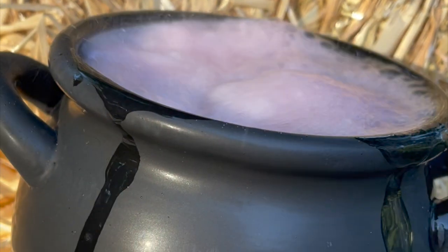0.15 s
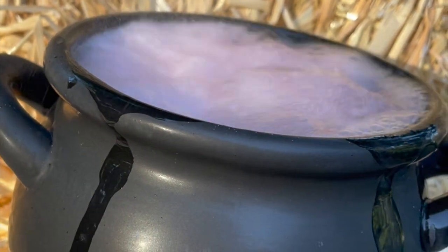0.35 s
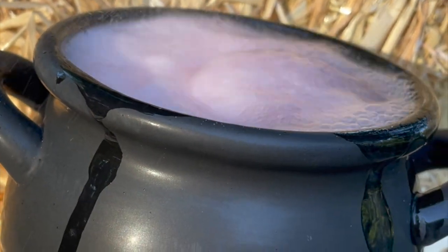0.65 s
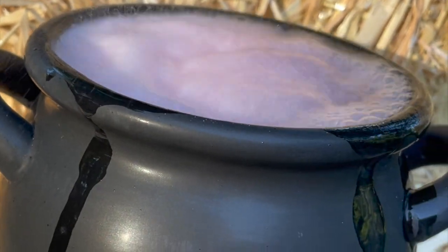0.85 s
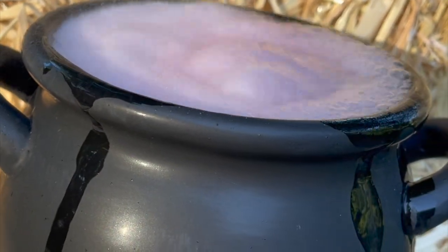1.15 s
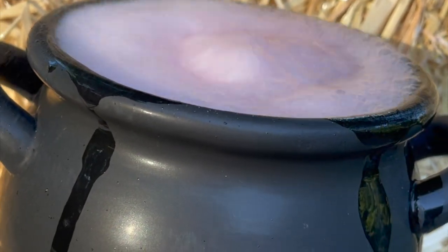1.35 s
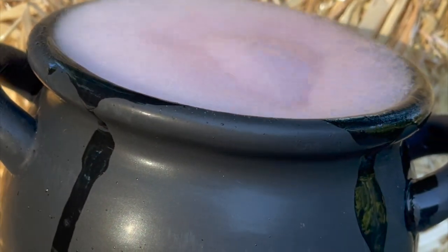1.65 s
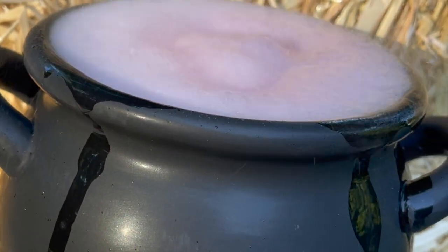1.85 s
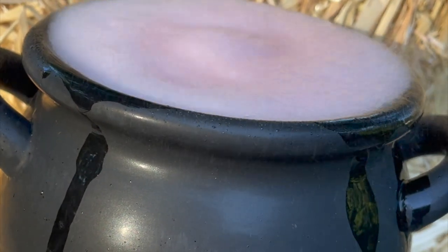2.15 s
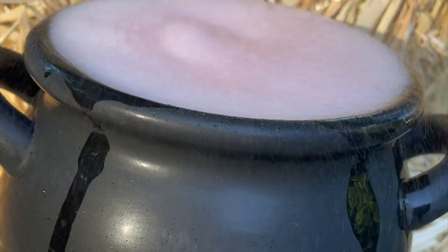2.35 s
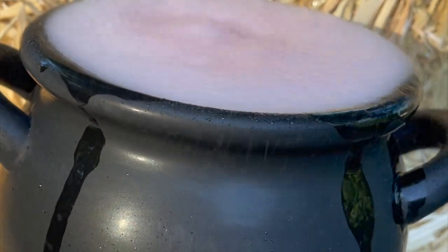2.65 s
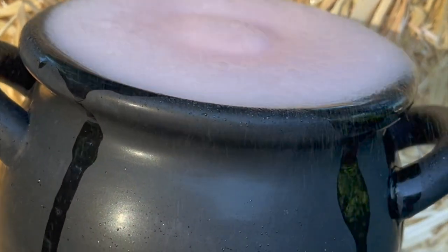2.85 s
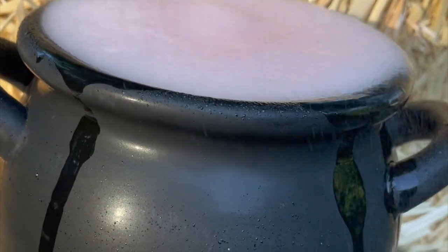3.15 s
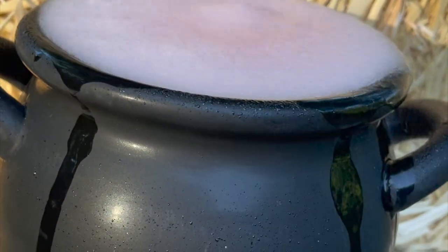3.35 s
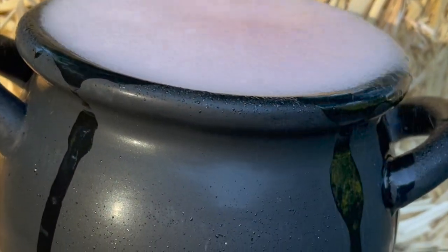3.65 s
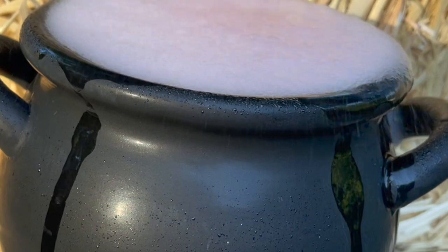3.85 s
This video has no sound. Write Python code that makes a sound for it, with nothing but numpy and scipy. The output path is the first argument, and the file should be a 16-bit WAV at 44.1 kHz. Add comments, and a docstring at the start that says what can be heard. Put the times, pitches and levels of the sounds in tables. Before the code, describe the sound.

Fizzing bath bomb hisses brightly in water, dulling as foam thickens, with pops and wind thumps

```python
"""A pop and a bright, dense fizz come first: a bath bomb in a small cauldron of water outdoors.
The fizz is a swarm of tiny pings over noise; it dulls as the foam thickens and larger bubbles pop.
Something hard clacks once near the start: four quick contacts set broad resonances ringing.
Light wind on the microphone is low noise that follows gusts, plus thumps of a few slowing swings."""
import sys
import numpy as np
from scipy import signal
from scipy.fft import rfft, irfft
from scipy.io import wavfile
from scipy.ndimage import uniform_filter1d

SR = 44100
rng = np.random.default_rng(int(sys.argv[2]) if len(sys.argv) > 2 else 0)


def dump(signal):
    """Clip the signal to [-1, 1] and save it as 16-bit WAV at the path in sys.argv[1]."""
    limited = np.clip(np.atleast_2d(signal).T, -1, 1)
    pcm = np.round(limited * 32767).astype(np.int16)
    wavfile.write(sys.argv[1], SR, pcm)


N = 176400  # samples: 4 seconds
TIME, BINS = np.arange(N) / SR, np.fft.rfftfreq(N, 1 / SR)  # s, Hz

# Hiss colour under thin foam: [f/Hz, level/dB per Hz]
THIN_FOAM_HISS = [(200, -26.5), (750, -15), (1150, -27), (1600, -18.5), (2600, -16.5), (3900, -8.5),
                  (4600, -11), (5400, -6), (6100, -9), (8500, -12.5), (9800, -8.5), (10900, 2.5),
                  (11700, -3.5), (12500, 0), (13600, -11), (15500, -37)]
# Hiss colour under thick foam: [f/Hz, level/dB per Hz]
THICK_FOAM_HISS = [(200, -9), (750, -15), (1120, -22), (1550, -8), (2700, -5.5), (4500, -11), (5400, -0.5),
                   (6100, -6), (6600, -9.5), (8500, -2.5), (9700, -1.5), (11000, 1), (12200, -17),
                   (15500, -87)]
# How the foam grows: [t/s, thickness 0-1, fizz level/dB added to the base levels below]
FOAM_GROWTH = [(0, 0.16, 3.5), (.55, 0.06, -1.5), (.9, 0.03, -0.5), (1.598, 0.32, 1.5), (2.5, 0.56, 1),
               (2.95, 0.9, 3), (4, 0.85, 3.5)]
# Broad hum of the thickening foam: [t/s, f/Hz, level/dB]
FOAM_HUM = [(2.2, 2280, -65), (2.901, 2023, -59), (4, 1459, -48)]
# Larger bubbles: [t/s, level/dB, f/Hz]
LARGE_POPS = [(.002, -6, 2860), (0.121, -21, 8070), (2.752, -29.5, 3190), (2.8933, -8, 4120),
              (3.0345, -23, 2950), (3.0368, -5.5, 9830), (3.0735, -24.5, 3800), (3.4897, -24, 11060),
              (3.532, -15.5, 9620), (3.563, -15.5, 4040), (3.6446, -12.5, 2890), (3.6853, -10.5, 4410),
              (3.741, -16.5, 6900), (3.9299, -16.5, 3800), (3.9464, -18, 7210), (3.958, -20.5, 2790),
              (3.985, -10, 4540)]
# Patches of collapsing foam: [centre t/s, length/s, level/dB, f/Hz]
FOAM_COLLAPSES = [(0.068, 0.074, -40, 3070), (.196, 0.02, -28, 2860), (.189, 0.019, -26, 10800),
                  (3.522, 0.042, -38.5, 6440)]
# Contacts of the hard clack: [t/s, level/dB, scrape decay/s, bass level/dB, treble level/dB]
CLACK_CONTACTS = [(.3357, -3, 0.0048, -18, -3), (.3392, -10, 0.0042, -1, 7.5), (.3450, -6, 0.0019, 0, 7),
                  (.3507, -6.5, 0.0026, 8, 2)]
# What the clack rings with: [f/Hz, level/dB]
CLACK_RESONANCES = [(200, -32.5), (680, -5), (1050, -12), (2200, 1), (2900, 0), (3700, -11), (5200, -18),
                    (6100, -11.5), (8000, -6), (9600, -13), (11000, -8.5), (13500, -40)]
# How long the far echoes last: [f/Hz, time to fade by 60 dB/s]
FAR_ECHO_FADE = [(2500, 0.22), (9000, 0.19)]
# Wind puffs: [centre t/s, level/dB, f at the centre/Hz, half length/s, pitch fall rate/per s]
WIND_PUFFS = [(0.137, -22, 127, 0.0057, 20), (3.518, -17.5, 83, 0.0072, 3), (3.6649, -7.5, 250, 0.0024, 24),
              (3.677, -8, 205, 0.0016, 20), (3.7201, -6.5, 304, 0.0014, 45), (3.727, -5.5, 142, 0.0066, 64)]
# Colour of the wind rumble: [f/Hz, level/dB per Hz]
WIND_COLOUR = [(62, 0.5), (140, 2.5), (250, -4), (500, -23), (1500, -43)]
# Strength of the wind: [t/s, level/dB]
WIND_GUSTS = [(0, -51.5), (.28, -44.5), (.45, -55), (.55, -45.5), (.95, -47.5), (1.58, -44), (2.6, -50.5),
              (3.42, -51.5), (3.5, -38.5), (3.77, -31), (3.87, -55)]
# How alike the two microphone ports hear a spread-out source: [f/Hz, likeness 0-1]
PORT_LIKENESS = [(300, 0.97), (650, 0.5), (1700, 0.92), (9500, 1)]
# How far the left port is ahead of the right: [f/Hz, phase lead/radians]
LEFT_PORT_LEAD = [(1700, 0.16), (4250, 1.4), (4850, 2.22), (5700, 7.76), (6400, 6.38), (8400, 8.98),
                  (9600, 9.83), (12000, 12.02)]

THIN_DB, THICK_DB, FLICKER_DB = -37, -42.5, .5  # base hiss levels; rms size of the level flicker
BURSTS_PER_S, BURST_RING_S = 9000, .0009  # for one swarm, all pitches together
BURST_SPREAD_DB = 3.6  # average boost in the uneven burst sizes, before a limit
WASH_SHARE = .68  # part of the fizz power that is smooth noise
PATCH_DB, PATCH_HZ, PATCH_S = 2.2, 300, .032  # clusters: rms size, approximate width and length
FOAM_HUM_WIDTH_HZ = 390
RUSTLE_GRAINS_PER_S, RUSTLE_WIDTH_HZ = 1300, 920
POP_SWELL_S, OVERTONE_RATIO, OVERTONE_DB = .00065, 1.67, -12  # overtone relative to the main ring
POP_SNAP, SNAP_WIDTH_HZ = .59, 480  # snap amount; distance from the pitch where its gain halves
SMALL_POPS_PER_S = 75  # rate that fully thick foam would give
SMALL_POP_DB, SMALL_POP_HZ = -34, (2800, 11000)  # middle level; lowest and highest pitch
CLACK_KICK, CLACK_GRIT, CLACK_RISE_S = 6, .65, .00043  # kick and scrape amounts; scrape rise
NEAR_DECAY_S, NEAR_DB, FAR_DB = .005, -8, -13  # echo levels relative to the direct sound
LOW_CUT_HZ, EDGE_HZ = 33.8, 15800  # bottom and top of what is heard


def amp(db):
    """Turns decibels into gain."""
    return 10 ** (np.asarray(db) / 20)


def unit(x):
    """Scales to an rms of 1."""
    return x / np.sqrt(np.mean(x ** 2) + 1e-20)


def read(points, hz):
    """Reads a table of values against frequency, with frequency spaced as the ear spaces pitch."""
    f, value = np.transpose(points)
    return np.interp(np.log(hz + 1), np.log(f + 1), value)


def colour(x, gain):
    """Filters by a gain for each frequency."""
    return irfft(rfft(x) * gain, x.shape[-1])


def add(mix, s, sound):
    """Adds a sound to the mix at s seconds, cutting off what runs past the end."""
    part = mix[:, max(round(s * SR), 0):][:, :sound.shape[-1]]
    part += sound[..., :part.shape[1]]


def pair(x):
    """Blends two unrelated signals until they are as alike as the ports hear a spread-out source."""
    z = rfft(x)
    same = read(PORT_LIKENESS, np.fft.rfftfreq(x.shape[1], 1 / SR))
    mid = np.sqrt((1 + same) / 2) * z[0]
    side = np.sqrt((1 - same) / 2) * z[1]
    return irfft(np.array([mid + side, mid - side]), x.shape[1])


def fizz():
    """Bubble bursts flicker in level and lose their top as the foam grows over them."""
    s, thick, db = np.transpose(FOAM_GROWTH)
    thick = np.interp(TIME, s, thick)
    swarm = patchy(pair(np.array([tiny_bursts(), tiny_bursts()])))
    bright = amp(THIN_DB) * unit(colour(swarm, amp(read(THIN_FOAM_HISS, BINS))))
    dull = amp(THICK_DB) * unit(colour(swarm, amp(read(THICK_FOAM_HISS, BINS))))
    flicker = unit(uniform_filter1d(rng.standard_normal(N), size=400))
    level = amp(np.interp(TIME, s, db) + FLICKER_DB * flicker)
    return ((1 - thick) * bright + thick * dull) * level


def tiny_bursts(count=40):
    """Each bubble gives a very short ping; many pitches and uneven sizes lie over a smooth wash."""
    t, pings = np.arange(512) / SR, np.zeros(N)
    for hz in np.linspace(SR / 100, EDGE_HZ, count):
        boost_db = BURST_SPREAD_DB * np.minimum(rng.exponential(1, N), 5)
        size = amp(boost_db) * rng.choice([-1, 1], N)
        train = size * (rng.random(N) < BURSTS_PER_S / count / SR)
        ping = np.exp(-t / BURST_RING_S) * np.sin(2 * np.pi * hz * t)
        pings += signal.oaconvolve(train, ping)[:N]
    wash = rng.standard_normal(N)
    return np.sqrt(1 - WASH_SHARE) * unit(pings) + np.sqrt(WASH_SHARE) * wash


def patchy(x):
    """Bubbles burst in clusters of like size: short patches swell and fade across the spectrum."""
    z = signal.stft(x, SR, nperseg=512)[2]
    field = rng.standard_normal(z.shape[1:])
    field = uniform_filter1d(field, round(PATCH_HZ * 512 / SR), axis=0)  # across pitch
    field = uniform_filter1d(field, round(PATCH_S * SR / 256), axis=1)  # along time
    return signal.istft(z * amp(PATCH_DB * unit(field)), SR, nperseg=512)[1][:, :N]


def foam_tone():
    """Fizz inside the foam rings a broad resonance that sinks as the layer grows."""
    s, hz, db = np.transpose(FOAM_HUM)
    # Slow noise carried up to the moving pitch becomes a band of noise around it.
    band = colour(rng.standard_normal((2, N)), 1 / (1 + (2 * BINS / FOAM_HUM_WIDTH_HZ) ** 4))
    turn = 2 * np.pi * np.cumsum(np.interp(TIME, s, hz)) / SR
    hum = unit(band[0] * np.cos(turn) + band[1] * np.sin(turn))
    return amp(np.interp(TIME, s, db)) * hum


def pop(db, hz):
    """A film snaps and the cavity under it rings for a few cycles, with one weak overtone."""
    t, f = np.arange(1024) / SR, np.fft.rfftfreq(1024, 1 / SR)
    noise = pair(rng.standard_normal((2, len(t))))
    snap = unit(colour(noise, 1 / (1 + abs((f - hz) / SNAP_WIDTH_HZ) ** 2.31)))
    overtone = amp(OVERTONE_DB) * np.sin(2 * np.pi * OVERTONE_RATIO * hz * t)
    ring = np.sin(2 * np.pi * hz * t) + overtone
    swell = t / POP_SWELL_S * np.exp(1 - t / POP_SWELL_S)  # peaks at 1, then dies away
    return amp(db) * swell * (ring + POP_SNAP * snap)


def small_pops(count=300):
    """Small bubbles pop faintly at random, more often when the foam is thick."""
    out, (s, thick, _) = np.zeros((2, N)), np.transpose(FOAM_GROWTH)
    low, high = SMALL_POP_HZ
    for when, chance, size, pitch in rng.random((count, 4)):
        start = when * N / SR
        rate = np.interp(start, s, thick) ** 4 * SMALL_POPS_PER_S
        if chance < rate * N / SR / count:
            add(out, start, pop(SMALL_POP_DB + 10 * (size - .5), low + (high - low) * pitch))
    return out


def rustle(s, length_s, db, hz):
    """A patch of foam gives way: a quick run of tiny bursts that swells and dies."""
    grains = rng.standard_normal((2, N)) * (rng.random(N) < RUSTLE_GRAINS_PER_S / SR)
    run = unit(colour(pair(grains), np.exp(-((BINS - hz) / RUSTLE_WIDTH_HZ) ** 2)))
    return amp(db) * run * np.exp(-2 * abs(TIME - s) / length_s)


def clack(db, decay_s, bass_db, treble_db):
    """One contact of something hard: a kick and a brief scrape set its broad resonances ringing."""
    t, f = np.arange(2048) / SR, abs(np.fft.fftfreq(2048, 1 / SR))
    tilt = [(900, bass_db), (2300, 0), (3200, 0), (6000, treble_db)]
    gain = amp(read(CLACK_RESONANCES, f) + read(tilt, f))
    # Minimum phase: the ringing starts at the contact, never before it.
    body = np.exp(np.conj(signal.hilbert(np.log(unit(gain)))))[:len(t) // 2 + 1]
    rise = np.minimum(t / CLACK_RISE_S, 1)
    fade = np.exp(-np.maximum(t - CLACK_RISE_S, 0) / decay_s)
    scrape = pair(rng.standard_normal((2, len(t)))) * rise * fade
    kick = t == 0
    return amp(db) * colour(CLACK_KICK * kick + CLACK_GRIT * scrape, body)


def surroundings(x):
    """Quick reflections from the pot, then a faint outdoor tail, both made of fading noise."""
    t = np.arange(SR // 2) / SR
    near = pair(rng.standard_normal((2, len(t)))) * np.exp(-t / NEAR_DECAY_S) * (t > .0015)
    hz, when, z = signal.stft(pair(rng.standard_normal((2, len(t)))), SR, nperseg=256)
    fade = amp(-60 * when / read(FAR_ECHO_FADE, hz)[:, None])
    far = signal.istft(z * fade, SR, nperseg=256)[1][:, :len(t)] * (t > .006)
    echo = amp(NEAR_DB) * near / np.linalg.norm(near[0])
    echo += amp(FAR_DB) * far / np.linalg.norm(far[0])
    return x + signal.fftconvolve(x, echo, axes=1)[:, :N]


def thump(db, hz, half_s, fall):
    """A puff of air hits the microphone: a few low swings that slow down."""
    t = np.arange(-4410, 4410) / SR
    pitch = hz * np.exp(-fall * np.clip(t, -2 * half_s, 2 * half_s))
    turns = np.cumsum(pitch) / SR
    swings = np.cos(2 * np.pi * (turns - turns[len(t) // 2]))
    return -amp(db) * np.exp(-(t / half_s) ** 2 / 2) * swings


def wind(lumpy_db=2.5):
    """Wind on the microphone makes a lumpy low rumble that follows the gusts."""
    rumble = unit(colour(pair(rng.standard_normal((2, N))), amp(read(WIND_COLOUR, BINS))))
    lumps = unit(colour(rng.standard_normal(N), np.exp(-(BINS / 18) ** 2)))
    return rumble * amp(np.interp(TIME, *np.transpose(WIND_GUSTS)) + lumpy_db * lumps)


def scene():
    """Fizz, pops and a clack in the open air, with wind on the microphone."""
    clicks, puffs = small_pops(), np.zeros((2, N))
    for s, *row in LARGE_POPS:
        add(clicks, s, pop(*row))
    clicks += sum(rustle(*row) for row in FOAM_COLLAPSES)
    for s, *row in CLACK_CONTACTS:
        add(clicks, s, clack(*row))
    for s, *row in WIND_PUFFS:
        puff = thump(*row)
        add(puffs, s - len(puff) / 2 / SR, puff)
    return fizz() + foam_tone() + surroundings(clicks) + wind() + puffs


def record(dry):
    """The microphone shifts phase between its ports, cuts lows, overloads, then limits the treble."""
    low_cut = np.tanh(BINS / LOW_CUT_HZ) ** 4
    # Each port takes half of the lead, in opposite directions.
    shift = np.exp(1j * np.outer([1, -1], read(LEFT_PORT_LEAD, BINS)) / 2)
    heard = np.clip(colour(dry, low_cut * shift), -1, 1)
    treble_limit = signal.firwin(511, EDGE_HZ, window=("kaiser", 9), fs=SR)
    return signal.oaconvolve(heard, treble_limit[None], "same")


dry = scene()
out = record(dry)
dump(out)
```